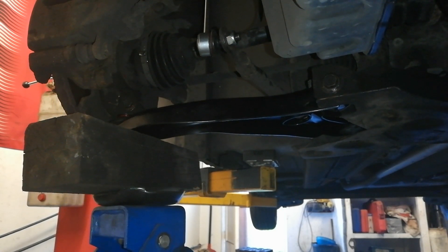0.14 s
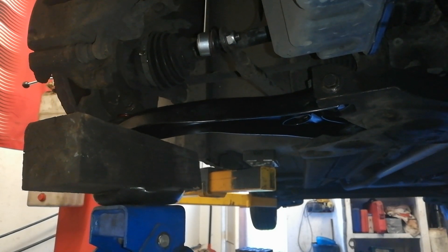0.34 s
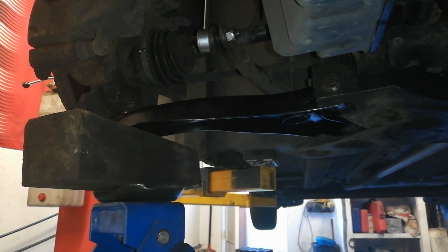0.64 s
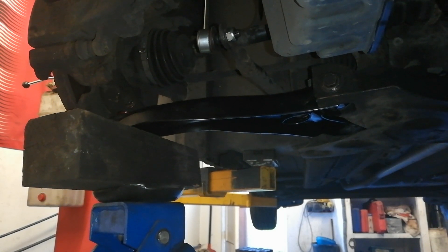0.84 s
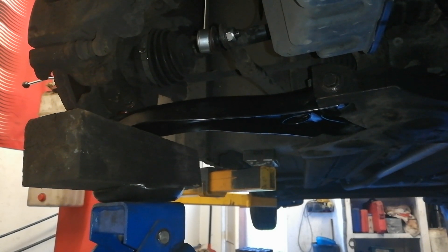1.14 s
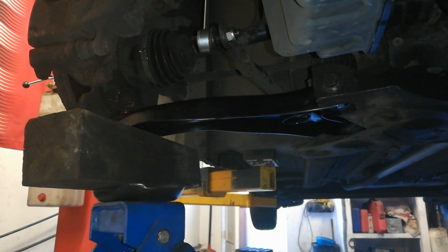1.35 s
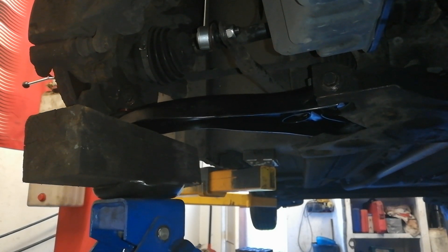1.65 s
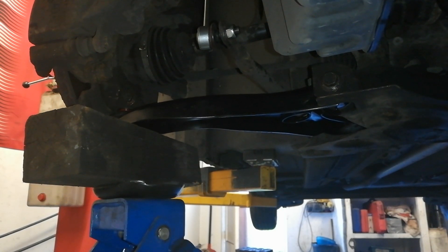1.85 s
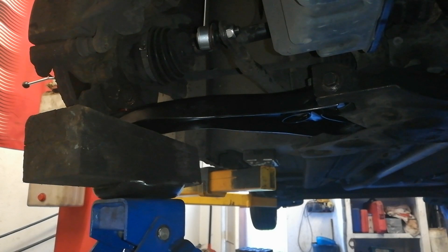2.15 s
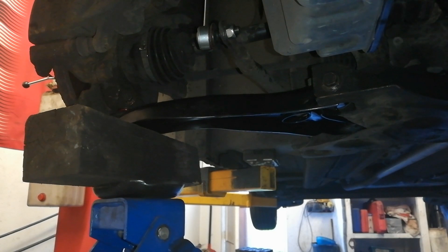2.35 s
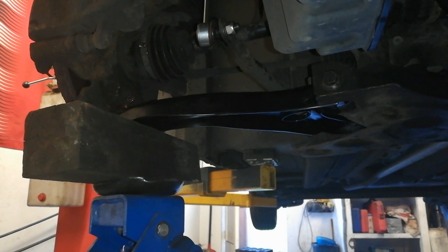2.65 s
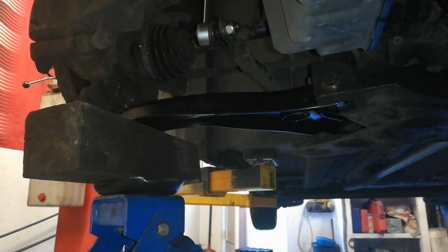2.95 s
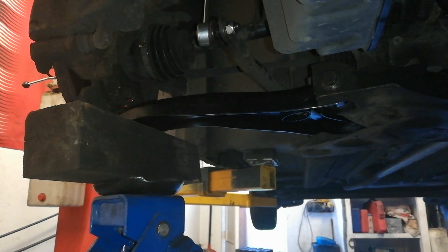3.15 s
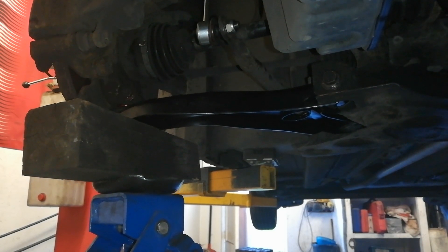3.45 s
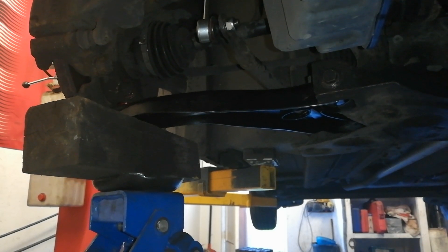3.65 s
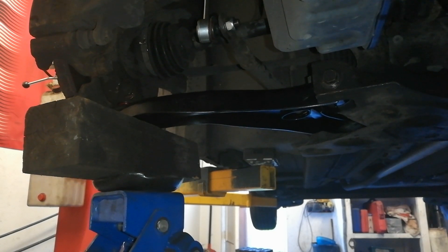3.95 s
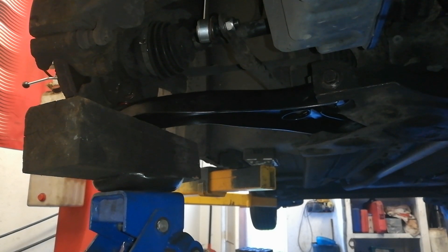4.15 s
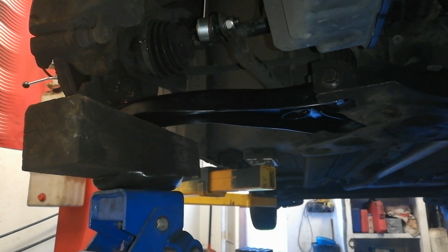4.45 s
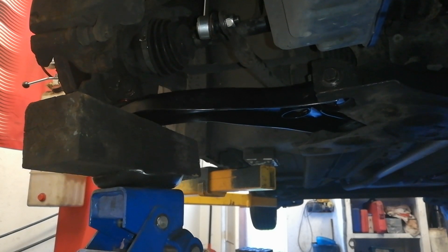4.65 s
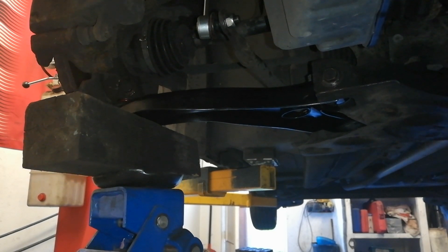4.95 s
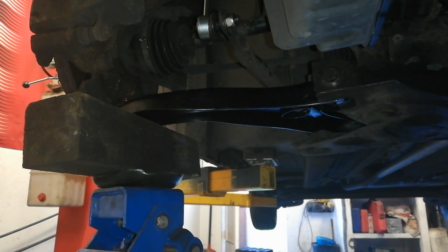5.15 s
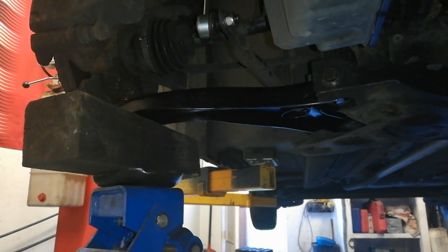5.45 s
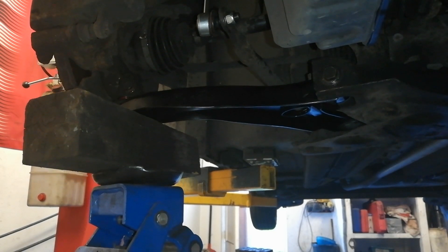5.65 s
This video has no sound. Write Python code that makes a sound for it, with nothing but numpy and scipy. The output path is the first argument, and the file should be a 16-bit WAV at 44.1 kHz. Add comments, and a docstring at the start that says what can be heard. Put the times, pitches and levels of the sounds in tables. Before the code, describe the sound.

Slow, regular metallic clanks of a jack handle ring in an echoing garage, with soft knocks and short oil hisses between strokes.

```python
"""A faint steady hum and a brief hiss of oil open the scene; a hydraulic trolley jack is then
pumped six times under a car in a reverberant garage. In each stroke the loose linkage tinks, the handle
clunks home and its steel parts clash and ring; on the way back the frame knocks and oil hisses into the pump.
Once, early on, steel slips with a loud crash. Blows are noise bursts filtered by part and room, plus
decaying modes; hum and oil are filtered noise."""
import sys
import numpy as np
from scipy import signal
from scipy.fft import rfft, irfft, next_fast_len
from scipy.io import wavfile
from scipy.ndimage import uniform_filter1d

SR = 44100
rng = np.random.default_rng(int(sys.argv[2]) if len(sys.argv) > 2 else 0)


def store_wav(level_fs):
    """Save 16-bit WAV to argv[1]."""
    pcm = np.round(np.clip(np.atleast_2d(level_fs), -1, 1) * 32767)
    wavfile.write(sys.argv[1], SR, pcm.T.astype(np.int16))


N = 255331
SIZE = 32768  # samples in one blow or room response
T, HZ = np.arange(SIZE) / SR, np.fft.rfftfreq(SIZE, 1 / SR)


def amp(db):
    """Decibel law: 20 dB is a tenfold amplitude."""
    return 10 ** (np.asarray(db) / 20)


def evened(x):
    """Power normalization: scales to rms 1."""
    return x / np.sqrt(np.mean(abs(x) ** 2) + 1e-20)


def unit_blow(x):
    """Energy normalization: scales a blow to the energy of a tenth of a second at rms 1."""
    return x / np.sqrt(np.sum(x ** 2) * 10 / SR + 1e-20)


def read(points, hz):
    """Logarithmic pitch scale: joins points by straight lines over log frequency."""
    f, value = np.transpose(points)
    return np.interp(np.log(hz + 1), np.log(f + 1), value)


def add(mix, s, sound):
    """Superposition: adds a sound at a time, which may lie before the start."""
    start = round(s * SR)
    sound = sound[max(-start, 0):]
    part = mix[max(start, 0):][:len(sound)]
    part += sound[:len(part)]


def causal(db):
    """Causality: the minimum-phase response of a gain curve rings only after the blow."""
    log_gain = np.log(amp(np.r_[db, db[-2:0:-1]]))
    return np.exp(np.conj(signal.hilbert(log_gain)))[:len(db)]


# Resonances of the jack frame and the space under the car.
# Each row: frequency in Hz, width in Hz, lift in dB.
FRAME_RESONANCES = [(80, 19, 11.5), (307, 13, 6.5), (383.8, 50.6, 12), (502.8, 19, 10), (604, 8.2, 7.5),
                    (642, 9.9, 7.5), (1062, 15, 3), (1405, 61, 2.5), (1486, 146, 9)]


def frame_db(hz):
    """Resonance: the frame and the space under the car lift narrow bands of what passes through."""
    return sum(db / (1 + (2 * (hz - f) / width) ** 2) for f, width, db in FRAME_RESONANCES)


# Reverberation of the garage. Each row: frequency in Hz, decay time t60 in seconds.
GARAGE_DECAY = [(80, 0.85), (300, 0.58), (700, 0.53), (1500, 0.58), (3000, 0.64), (5500, 0.5), (8000, 0.42),
                (11000, 0.33), (15500, .27)]


def garage(build_s=0.0026, early_s=0.037, early=0.27):
    """Reverberation: diffuse echoes build up, are stronger early on, and die band by band."""
    hz, t, z = signal.stft(rng.standard_normal(SIZE), SR, nperseg=256)
    decay = amp(-60 * t / read(GARAGE_DECAY, hz)[:, None])
    tail = signal.istft(z * decay, SR, nperseg=256)[1][:SIZE]
    tail *= (1 - np.exp(-T / build_s)) * (1 + early * np.exp(-T / early_s))
    return rfft(tail / np.linalg.norm(tail))


def chatter(contact_s, response, grain=0.71, clump_db=4.0, clump_hz=350, size=8192):
    """Micro-impacts: a flurry of tiny clumped hits swells and fades, filtered by steel and room."""
    u = T[:size] / max(contact_s, 1e-4)
    hits, weights, clumps = rng.standard_normal((3, size))
    clumps = np.interp(T[:size] * clump_hz, np.arange(size), clumps)
    uneven_hits = hits * np.exp(grain * weights.clip(-2, 2))
    impacts = uneven_hits * amp(clump_db * clumps) * u * np.exp(-u)
    return unit_blow(irfft(rfft(impacts, SIZE) * response))


def tones(modes, waver=0.93, waver_hz=45, count=128):
    """Modal decay: one dying tone for each mode, which the room's echoes make waver."""
    bank = []
    for hz, db, t60 in modes:
        a, b = rng.standard_normal((2, count))
        echoes = 1 + waver * np.interp(T * waver_hz, np.arange(count), a + 1j * b)
        dying = amp(db - 60 * T / t60)
        bank.append(echoes * np.exp(2j * np.pi * hz * T) * dying)
    return np.array(bank, np.complex64)


def ring(bank, contact_s, lift_db=0):
    """Modal superposition: modes start at chance phases and swell in over a time set by the contact."""
    push = amp(lift_db) * np.exp(2j * np.pi * rng.random(len(bank)))
    swell = 1 - np.exp(-np.minimum(T / max(contact_s, 1e-4) / 2, 10) ** 2)
    note = (push.astype(np.complex64)[:, None] * bank).sum(0).real
    return unit_blow(note * swell)


def blows(rows, colour, modes, room, wet_db, ring_db):
    """Impact excitation: each blow chatters and rings its part; a rising tilt favours high modes."""
    out, bank = np.zeros(N), tones(modes)
    response = causal(read(colour, HZ) + frame_db(HZ)) * (1 + amp(wet_db) * room)
    octaves, mode_octaves = np.log2(np.hypot(HZ, 300)), np.log2([hz for hz, *_ in modes])
    for s, db, contact_s, tilt_db, *_ in rows:
        # the tilt pivots at 2 ** 10 = 1024 Hz
        rattle = chatter(contact_s, response * amp(tilt_db * (octaves - 10)))
        note = ring(bank, contact_s, tilt_db * (mode_octaves - 10))
        add(out, s, amp(db) * unit_blow(rattle + amp(ring_db) * note))
    return out


# Spectrum of the garage's noise. Each row: frequency in Hz, relative spectral level in dB.
AIR_COLOUR = [(12, -35), (22, 0.5), (50, 1), (78, -4), (140, -8.5), (240, -6.5), (382, -10.5), (700, -6),
              (1150, -11.5), (1500, -7.5), (2000, -11.5), (2700, -15.5), (4000, -19), (6200, -23.5),
              (15500, -28.5)]
AIR_DB = -55.5


def air():
    """Filtered noise: a faint steady noise hums in the space under the car."""
    size = next_fast_len(N)
    hz = np.fft.rfftfreq(size, 1 / SR)
    gain = amp(read(AIR_COLOUR, hz) + frame_db(hz))
    noise = irfft(rfft(rng.standard_normal(size)) * gain, size)[:N]
    return amp(AIR_DB) * evened(noise)


# The handle is lifted and the pump refills. Each row: start in seconds, frame knock in dB,
# oil hiss in dB, delay of the valve click in seconds.
LIFTS = [(-.115, -57, -45.5, .1), (.925, -45.5, -46, 0.096), (1.884, -48, -48, 0.099),
         (2.92, -48, -46.5, 0.098), (3.887, -49.5, -48, .14), (4.923, -49.5, -44, 0.099)]
# Spectrum of the oil in the valve. Each row: frequency in Hz, relative spectral level in dB.
OIL_COLOUR = [(100, -22), (400, -10.5), (1100, 2), (1500, 3), (1950, -4.5), (2400, 5), (2900, 2),
              (3300, -6), (3900, -1), (4600, -20.5), (6000, -11), (7200, -30), (10000, -28), (15000, -37)]
FLOW_PEAK_S, FLOW_HALF_S = 0.11, 0.057  # delay of the fastest flow after the lift; time scale of the flow


def oil(flutter_db=2, grain=0.37):
    """Flow noise: oil fizzes through the inlet valve, loudest where the piston moves fastest."""
    t = np.arange(N) / SR
    flow = sum(amp(db) / np.cosh((t - s - FLOW_PEAK_S) / FLOW_HALF_S) for s, _, db, _ in LIFTS)
    flutter = evened(uniform_filter1d(rng.standard_normal(N), size=250))
    grains = rng.standard_normal(N) * np.exp(grain * rng.standard_normal(N))
    fizz = grains * amp(flutter_db * flutter)
    valve = irfft(causal(read(OIL_COLOUR, HZ) + frame_db(HZ)))
    return flow * evened(signal.fftconvolve(fizz, valve)[:N])


# Small dry ticks close by. Each row: start in seconds, nominal level in dB.
TICKS = [(1.621, -44), (2.7778, -30.5), (3.047, -36)]
# One dry pop. The row: start in seconds, peak in dB, length in seconds.
POP = (2.7735, -22, 0.00118)


def ticks(tick_s=0.0004, pop_low_hz=90):
    """Transients without reverberation: decaying bursts of bright noise and one high-passed pulse."""
    out = np.zeros(N)
    for s, db in TICKS:
        bright = np.diff(rng.standard_normal(SIZE + 1)) / 2
        add(out, s, amp(db) * bright * np.exp(-T / tick_s))
    s, db, length = POP
    high_pass = signal.butter(1, pop_low_hz, "high", fs=SR)
    add(out, s, amp(db) * signal.lfilter(*high_pass, 1. * (T < length)))
    return out


# The slip jolts frame and car. Each row: start in seconds, level in dB, contact time in seconds,
# tilt in dB per octave, boom of the car body in dB.
JOLTS = [(0.456, -35, .0015, -10, -45.5), (.475, -26, .0037, -6.5, -47)]
# Spectrum of the knocking frame. Each row: frequency in Hz, relative spectral level in dB.
KNOCK_COLOUR = [(30, -16), (80, -5), (140, -14), (280, -7), (380, 4.5), (700, 0.5), (1500, -3), (2200, -10),
                (3800, -10), (5000, -18), (8000, -20.5), (15000, -41.5)]
# Modes of handle and frame. Each row: frequency in Hz, relative level in dB, decay time t60 in seconds.
HANDLE_MODES = [(371, -13, 0.75), (396, -9, 0.62), (501, -3.5, .65), (533, -10.5, 0.564), (611, -2, 0.47),
                (654, -6, 0.97), (779, -12.5, 1), (1061, 0.5, 0.91), (1147, -5.5, 0.61), (1300, -8, .5),
                (1392, 2.5, 0.3), (1446, 5, 0.25), (1517, -1.5, 0.87), (1654, -12, 0.64), (1886, -4, 0.43),
                (1880, 1, 0.42), (2202, -1.5, 0.52)]


def jolts(room):
    """Low-frequency impact: falling tilts leave the two jolts of the slip dull."""
    return blows(JOLTS, KNOCK_COLOUR, HANDLE_MODES, room, wet_db=-1, ring_db=-6)


# The handle clunks home and the loose steel parts clash. Each row: start in seconds, clunk in dB,
# boom of the car body in dB, clash delay in seconds, clash in dB, clash contact time in seconds,
# high ring in dB, rebound in dB relative to the clash.
STROKES = [(.286, -25, -44.5, 0.014, -23, 0.0081, -27.5, -17),
           (1.301, -25.5, -51.5, 0.0022, -26.5, 0.011, -32.5, -4),
           (2.302, -24.5, -48, 0.0029, -24, .016, -37, -17),
           (3.307, -25, -50, 0.0062, -22, .016, -32.5, -14), (4.295, -25, -47, .008, -24, 0.014, -26.5, -7),
           (5.342, -25, -55, 0, -31, 0.0025, -51, -13.5)]
# Modes of the car body. Each row: frequency in Hz, relative level in dB, decay time t60 in seconds.
BODY_MODES = [(62, -9.5, .55), (82.3, 4, 0.94), (101, -12, 0.32)]


def boom(swell_s=0.005):
    """Structural resonance: the car body answers each clunk and jolt with a low, short boom."""
    out, bank = np.zeros(N), tones(BODY_MODES, waver=.2, waver_hz=19)
    from_clunks = [(s, db) for s, _, db, *_ in STROKES]
    from_jolts = [(s, db) for s, *_, db in JOLTS]
    for s, db in from_clunks + from_jolts:
        add(out, s, amp(db) * ring(bank, swell_s))
    return out


# The handle starts down and the linkage takes up its slack. Each row: start in seconds, tink in dB,
# frame knock in dB, tilt in dB per octave, delay of the second tink in seconds, second tink in dB.
SLACK = [(.198, -54.5, -42, -0.5, 0.039, -46), (1.185, -51, -50.5, -2.5, 0.037, -49),
         (2.163, -47, -49.5, -1.5, .083, -47.5), (3.172, -49, -46.5, 1.5, 0.058, -40.5),
         (4.176, -44.5, -47.5, 1, .083, -65), (5.231, -50, -47, -2.5, 0.1, -49)]
# Spectrum of the linkage. Each row: frequency in Hz, relative spectral level in dB.
TINK_COLOUR = [(100, -24.5), (1200, 0.5), (3000, -4), (4000, -4.5), (6500, 4), (8000, -10), (10300, 1),
               (11500, -5.5), (15500, -5)]
# Modes of the linkage. Each row: frequency in Hz, relative level in dB, decay time t60 in seconds.
LINK_MODES = [(3000, -13.5, 0.45), (3500, -6, 0.26), (3910, -4, 0.44), (4450, -1, 0.28), (4969, -4.5, .4),
              (5450, -2.5, 0.37), (6503, 3.5, 0.36), (6500, -0.5, 0.347), (6800, -1, 0.31),
              (7500, -4, 0.24), (8200, -3, .3), (8540, -3, .3), (9200, -1.5, 0.41), (9800, -5.5, 0.29),
              (10300, -0.5, 0.27), (12600, -2, .25), (12645, -0.5, .25), (13500, -5.5, .25),
              (15100, -15, .25)]
TINK_CONTACT_S = .0022


def tinks(room):
    """Impact across slack: the linkage tinks twice as its play is taken up."""
    rows = []
    for s, db, _, tilt_db, delay_s, second_db in SLACK:
        rows.append((s, db, TINK_CONTACT_S, tilt_db))
        rows.append((s + delay_s, second_db, TINK_CONTACT_S, tilt_db))
    return blows(rows, TINK_COLOUR, LINK_MODES, room, wet_db=9.5, ring_db=-2.0)


# The handle stops at the bottom and the frame knocks.
# Each row: start in seconds, level in dB, contact time in seconds.
STOPS = [(1.639, -50, 0.0025), (2.73, -50, 0.0013), (3.697, -43.5, 0.0085), (4.705, -40.5, 0.0075),
         (5.713, -43.5, 0.0045)]
STOP_NEUTRAL_DB, STOP_TILT_PER_DB = -43.5, 1.13  # a louder stop is brighter: dB per octave for each dB
SETTLE_GAP_S, SETTLE_DROP_DB, SETTLE_CONTACT_S = .046, 5, 0.0039
SETTLE_JITTER_S, SETTLE_TILT_SPREAD_DB = .008, 4


def stop_knocks(count=3):
    """Dissipation: after each bottom stop the load settles in ever softer, uneven knocks."""
    for s, db, contact_s in STOPS:
        tilt_db = STOP_TILT_PER_DB * (db - STOP_NEUTRAL_DB)
        yield s, db, contact_s, tilt_db
        for k, (late, bright) in enumerate(rng.uniform(-0.9, 1, (count, 2)), 1):
            settle_s = s + k * SETTLE_GAP_S + SETTLE_JITTER_S * late
            yield settle_s, db - k * SETTLE_DROP_DB, SETTLE_CONTACT_S, SETTLE_TILT_SPREAD_DB * bright


SLACK_KNOCK_CONTACT_S = .006
LOAD_LEAD_S, LOAD_KNOCK_DB, LOAD_CONTACT_S = .034, -49.5, 0.0023  # the frame takes the load before the clunk
LIFT_CONTACT_S, LIFT_TILT_DB = 0.002, 2  # tilts in dB per octave
VALVE_DB, VALVE_CONTACT_S, VALVE_TILT_DB = -52, 0.0024, 3


def knock_rows():
    """Changes of load: the frame knocks at slack, load, stop, lift and the click of the valve."""
    for s, _, db, tilt_db, *_ in SLACK:
        yield s, db, SLACK_KNOCK_CONTACT_S, tilt_db
    for s, *_ in STROKES:
        yield s - LOAD_LEAD_S, LOAD_KNOCK_DB, LOAD_CONTACT_S, 0
    yield from stop_knocks()
    for s, db, _, valve_s in LIFTS:
        yield s, db, LIFT_CONTACT_S, LIFT_TILT_DB
        yield s + valve_s, VALVE_DB, VALVE_CONTACT_S, VALVE_TILT_DB


def knocks(room):
    """Structure-borne impact: each knock sounds through the modes of the frame and the room."""
    return blows(knock_rows(), KNOCK_COLOUR, HANDLE_MODES, room, wet_db=4.0, ring_db=-9.0)


# Steel slips under the load. Each row: start in seconds, level in dB, contact time in seconds,
# tilt in dB per octave.
CRASH = [(.4705, -22, 0.0023, -0.9), (.487, -15, 0.018, 1.5)]
# Spectrum of the crash. Each row: frequency in Hz, relative spectral level in dB.
CRASH_COLOUR = [(30, -8), (80, -17), (140, -21.5), (260, -12.5), (380, -4.5), (520, 0.5), (800, 2.5),
                (1600, -0.5), (2600, 1.5), (4500, 0.5), (6500, 3.5), (10000, 1), (11500, -4), (15500, -13)]
# Modes of the slipping steel. Each row: frequency in Hz, relative level in dB, decay time t60 in seconds.
CRASH_MODES = [(1040, -1, 0.66), (2070, 0, 0.58), (3630, 4.5, 0.46), (3820, 2.5, 0.38), (4470, -12, 0.48),
               (4880, -16.5, .45), (4915, -7.5, 0.59), (5470, -5, .45), (6030, -1.5, 0.55),
               (5900, -13, .42), (7030, -10.5, .45), (7500, -7.5, 0.36), (7460, -29, 0.393),
               (8660, -1.5, 0.44), (9200, -1, 0.22), (10900, -2.5, 0.25), (10340, 2.5, .35),
               (12161, -3.5, 0.34)]


def crash(room):
    """Broadband impact: steel slips in two close blows that set many modes ringing."""
    return blows(CRASH, CRASH_COLOUR, CRASH_MODES, room, wet_db=9, ring_db=-8.0)


# Spectrum of the loose steel parts. Each row: frequency in Hz, relative spectral level in dB.
CLASH_COLOUR = [(60, -14.5), (250, -23.5), (450, -2.5), (1500, -7), (2300, -1.5), (3000, -4.5), (3800, 1.5),
                (5000, 0), (6500, 5.5), (7600, 1), (8500, 2), (10400, 3), (11300, -5.5), (15500, -5.5)]


def slide(room, lead_s=0.0048, slide_db=-19, slide_s=0.013):
    """Friction: the handle begins to scrape in its socket an instant before it clunks."""
    out, response = np.zeros(N), causal(read(CLASH_COLOUR, HZ)) * (1 + room)
    for s, db, *_ in STROKES:
        add(out, s - lead_s, amp(db + slide_db) * chatter(slide_s, response))
    return out


# Close modes of one small steel part. Each row: frequency in Hz, relative level in dB,
# decay time t60 in seconds.
HIGH_RING = [(8268, 0, .58), (8243, -11, .58), (8335, -8, .5)]


def high_ring():
    """Beating: one small steel part sings on after each clash in closely spaced modes."""
    out = np.zeros(N)
    for s, _, _, delay_s, _, contact_s, db, _ in STROKES:
        bank = tones(HIGH_RING, waver=1.0, waver_hz=56.5)
        add(out, s + delay_s, amp(db) * ring(bank, contact_s))
    return out


# Modes of the loose steel parts. Each row: frequency in Hz, relative level in dB,
# decay time t60 in seconds.
STEEL_MODES = [(3343, -8, .55), (3585, -3, .6), (3908, -3, .5), (4565, -6, .55), (5190, -6, .42),
               (6164, -1, .42), (6471, -1, .45), (6880, -2, .38), (8500, -2, .5), (8645, -1, .42),
               (8818, 0, .48), (9012, -3, .45), (9275, -3, .45), (10290, 1, .36), (11860, -13, .35),
               (12672, -8, .32), (13566, -11, .28)]
CLASH_TILT_DB = -0.6  # per octave
REBOUND_S, REBOUND_CONTACT_S = .075, 0.0023


def clashes(room):
    """Rebound: the loose parts clash at or just after each clunk and fall back once."""
    rows = []
    for s, _, _, delay_s, db, contact_s, _, rebound_db in STROKES:
        clash_s = s + delay_s
        rows.append((clash_s, db, contact_s, CLASH_TILT_DB))
        rows.append((clash_s + REBOUND_S, db + rebound_db, REBOUND_CONTACT_S, CLASH_TILT_DB))
    return blows(rows, CLASH_COLOUR, STEEL_MODES, room, wet_db=3.0, ring_db=-12.5)


# Spectrum of the clunking handle. Each row: frequency in Hz, relative spectral level in dB.
CLUNK_COLOUR = [(30, -20.5), (80, -23), (130, -26.5), (260, -17), (370, -7), (600, -3.5), (850, -1.5),
                (1150, 1), (1500, -0.5), (1900, -4), (2300, -14.5), (5000, -20.5), (15000, -45)]
CLUNK_CONTACT_S, CLUNK_TILT_DB = .0025, 0  # tilt per octave


def clunks(room):
    """Short contact: the handle strikes home once in each stroke and rings in its modes."""
    rows = [(s, db, CLUNK_CONTACT_S, CLUNK_TILT_DB) for s, db, *_ in STROKES]
    return blows(rows, CLUNK_COLOUR, HANDLE_MODES, room, wet_db=5.5, ring_db=-6.5)


def scene():
    """Superposition: the jack's blows and hiss sum over the faint noise of the garage."""
    room = garage()
    background = air() + oil() + ticks()
    slip = jolts(room) + crash(room)
    frame = boom() + tinks(room) + knocks(room)
    handle = slide(room) + high_ring() + clashes(room) + clunks(room)
    return (background + slip + frame + handle)[None]


EDGE_HZ = 15850


def record(dry):
    """Band limitation: a linear-phase low-pass filter removes what lies above the edge."""
    low_pass = signal.firwin(511, EDGE_HZ, window=("kaiser", 9), fs=SR)
    return signal.oaconvolve(dry, low_pass[None], "same")


dry = scene()
out = record(dry)
store_wav(out)
```